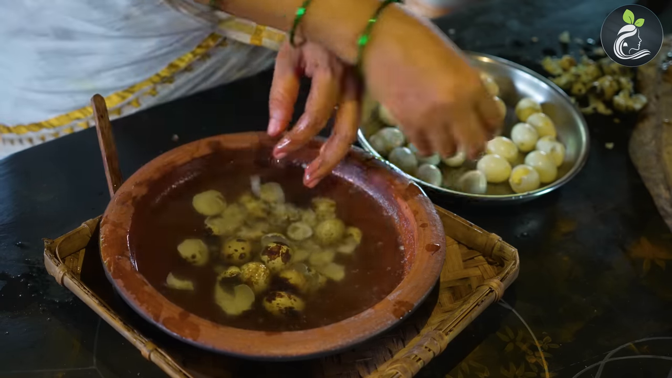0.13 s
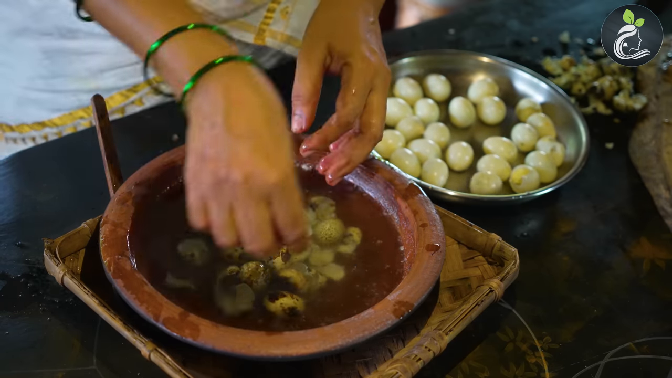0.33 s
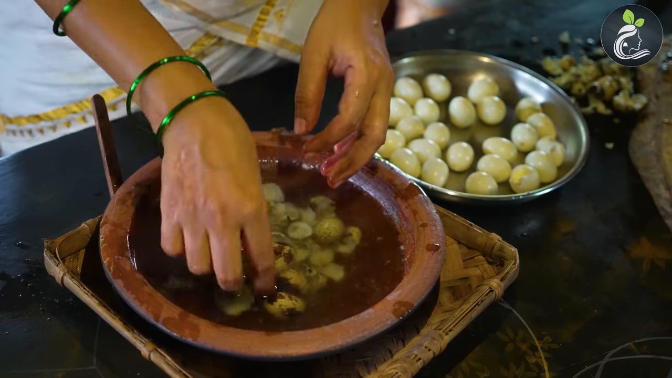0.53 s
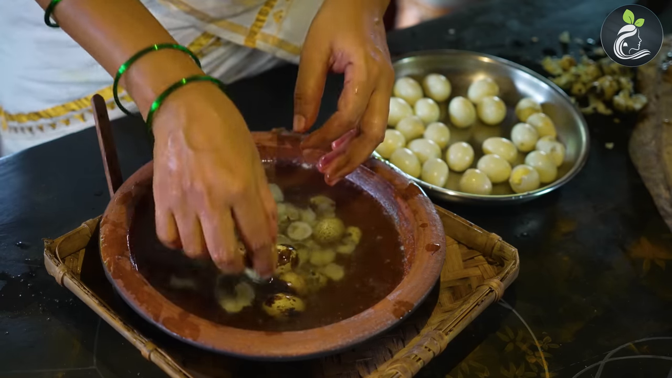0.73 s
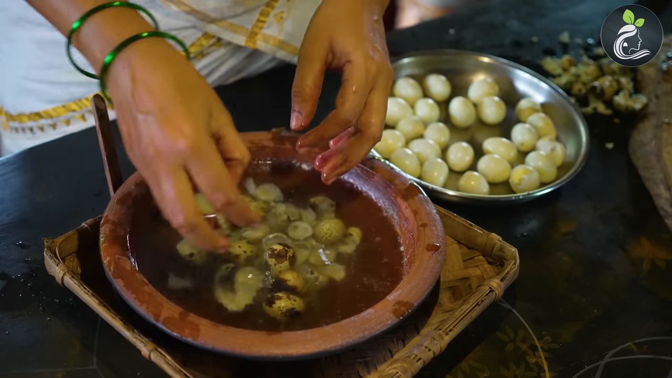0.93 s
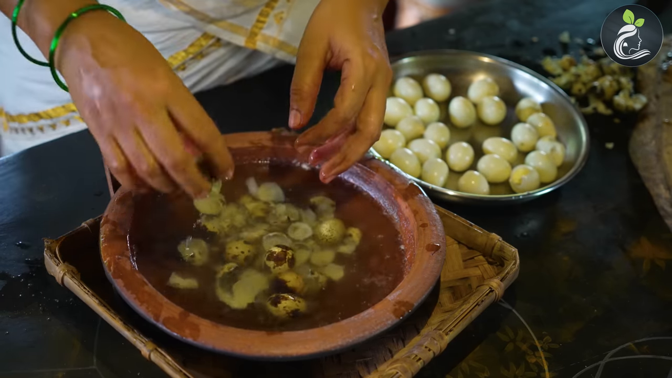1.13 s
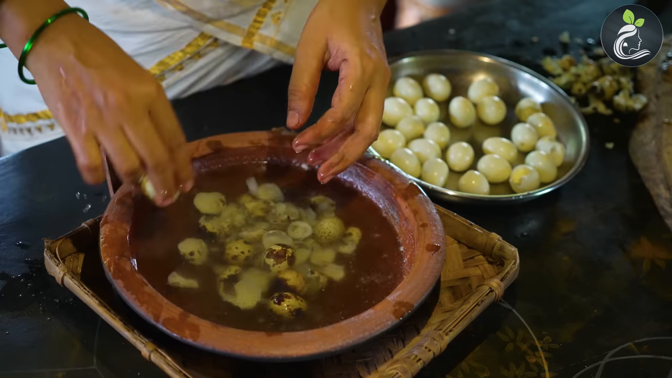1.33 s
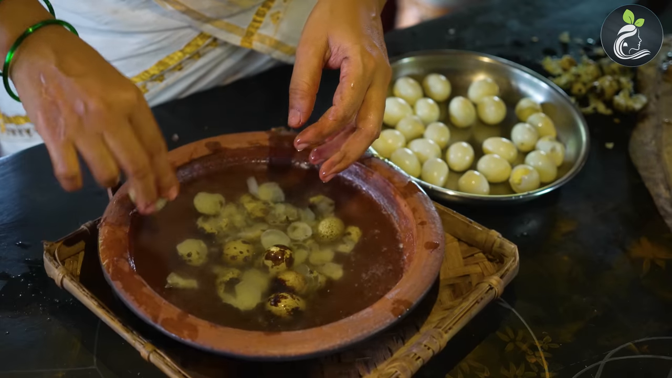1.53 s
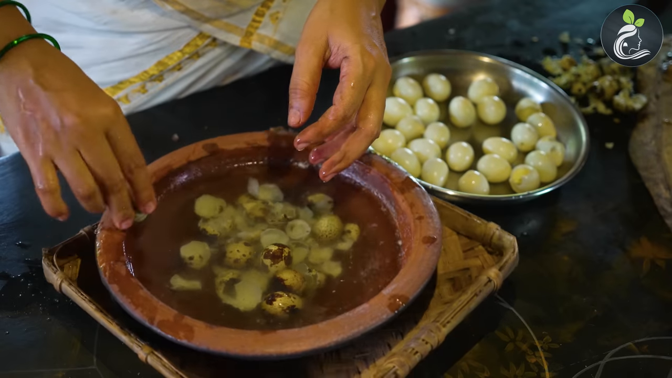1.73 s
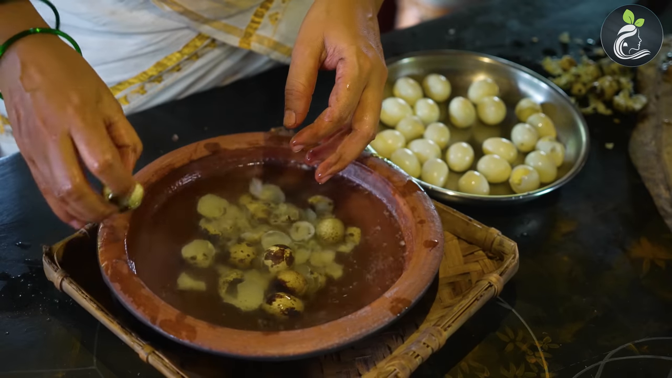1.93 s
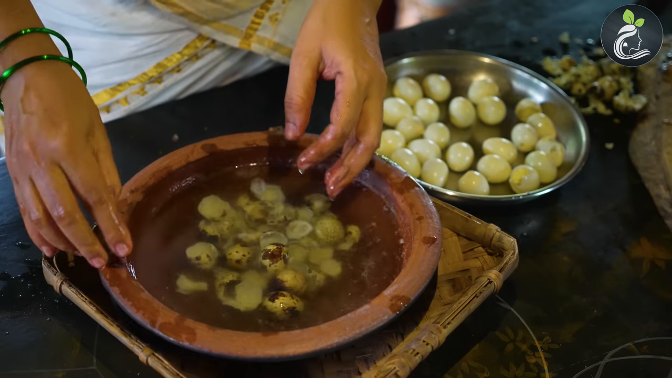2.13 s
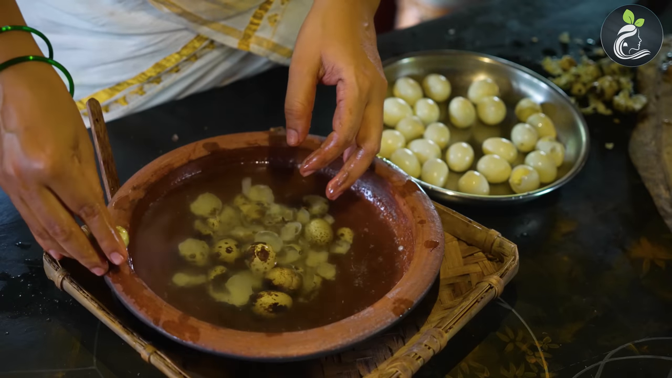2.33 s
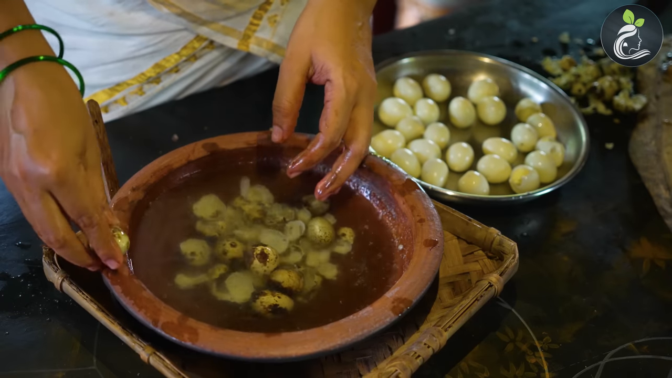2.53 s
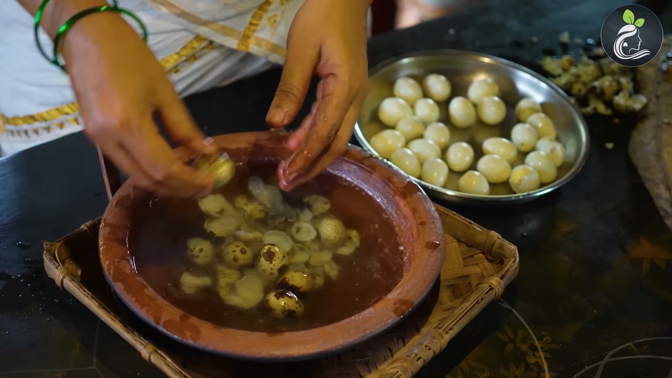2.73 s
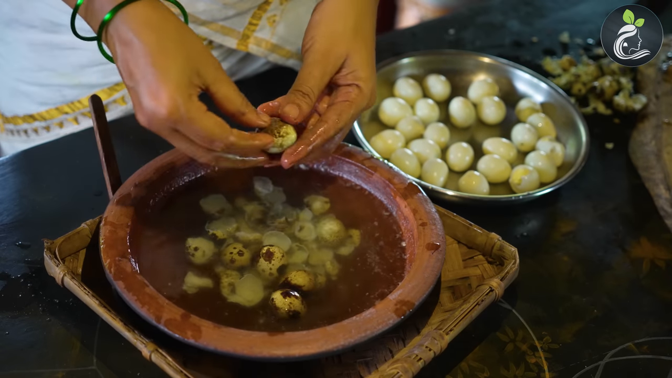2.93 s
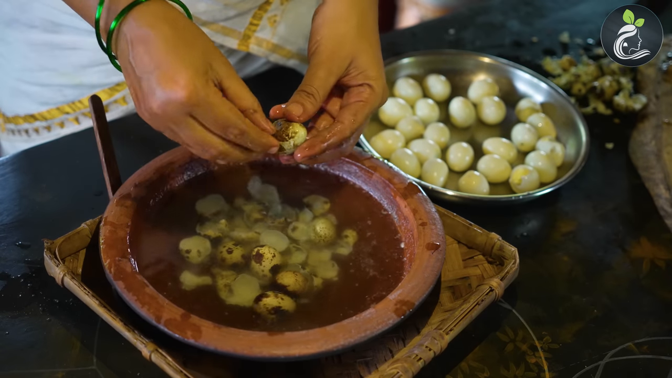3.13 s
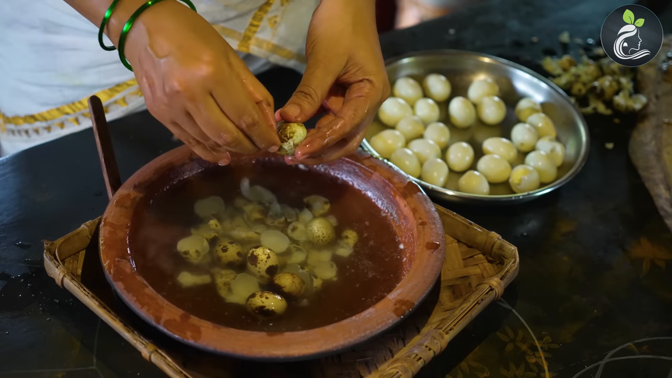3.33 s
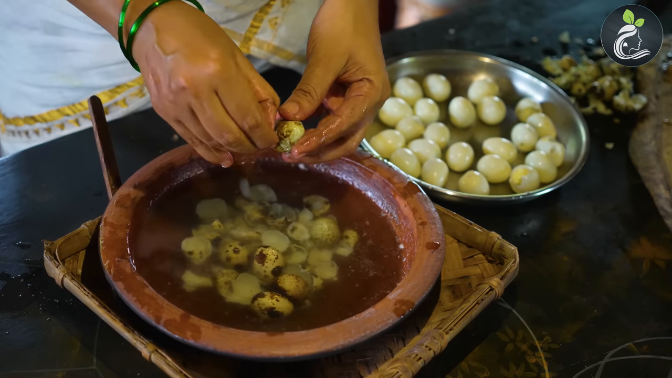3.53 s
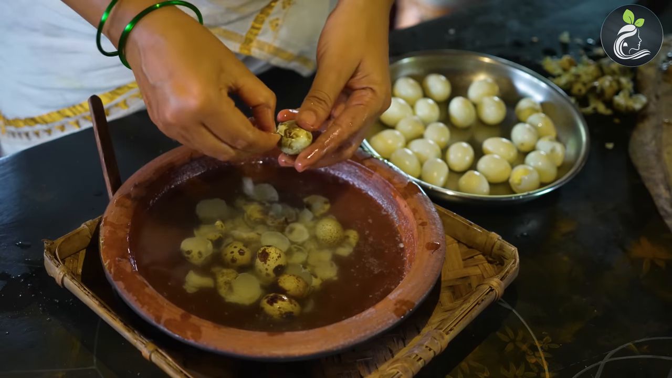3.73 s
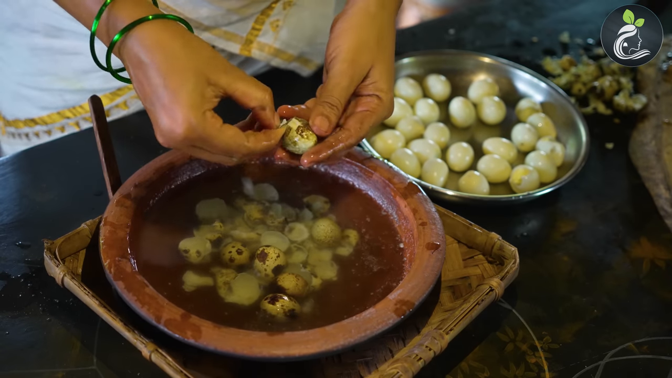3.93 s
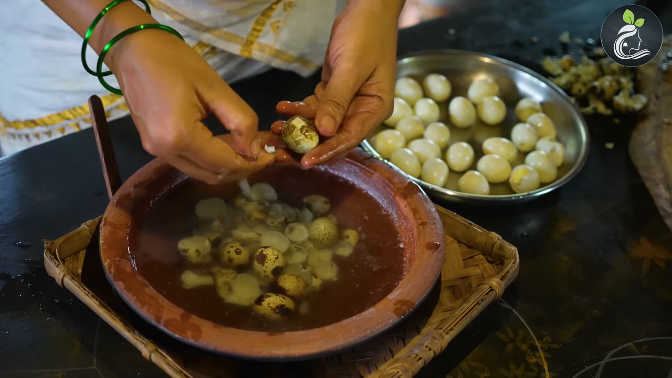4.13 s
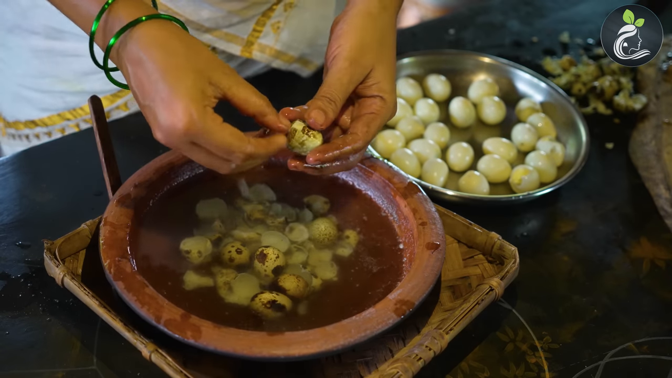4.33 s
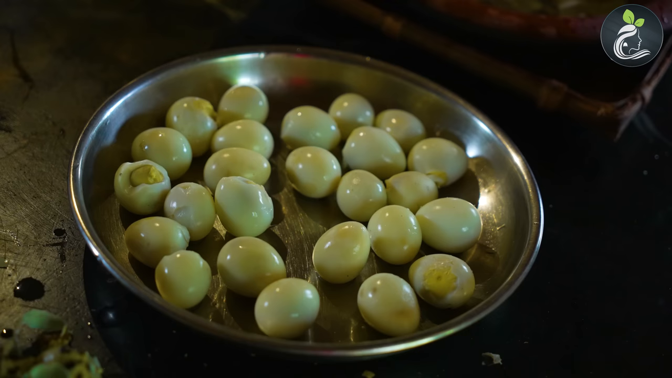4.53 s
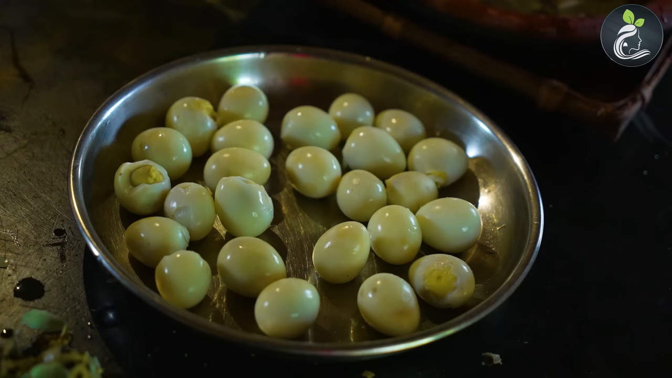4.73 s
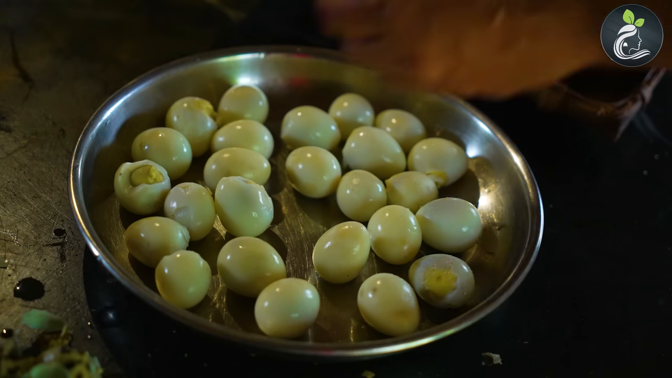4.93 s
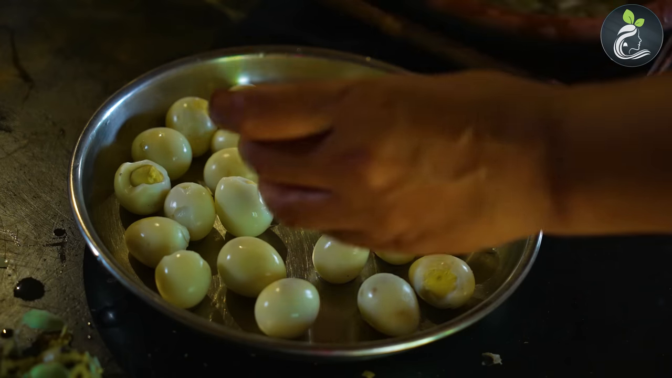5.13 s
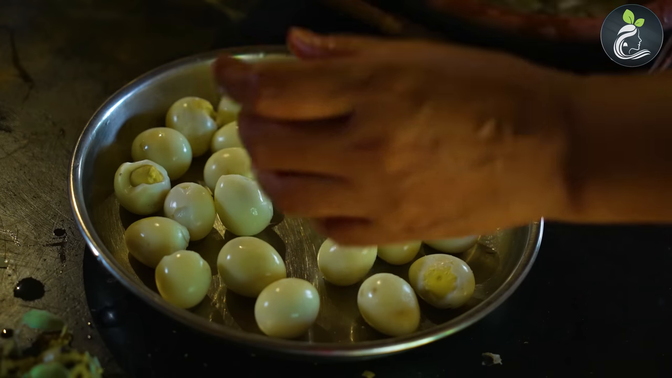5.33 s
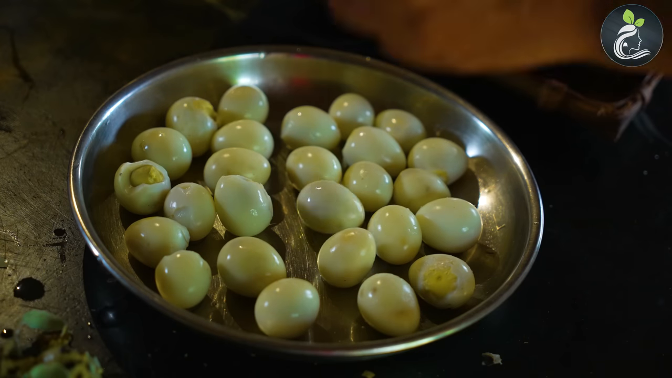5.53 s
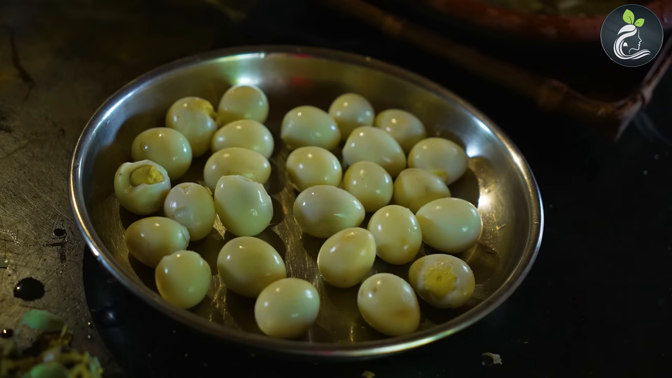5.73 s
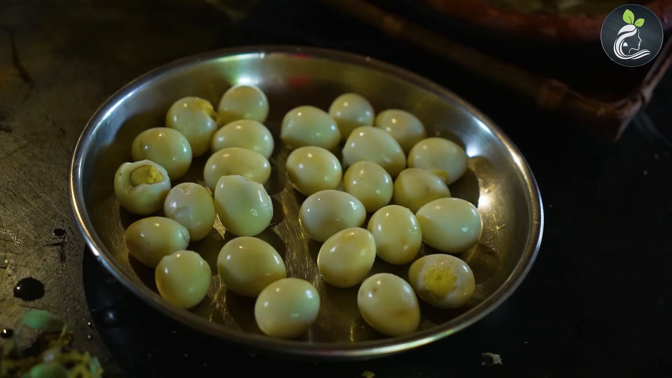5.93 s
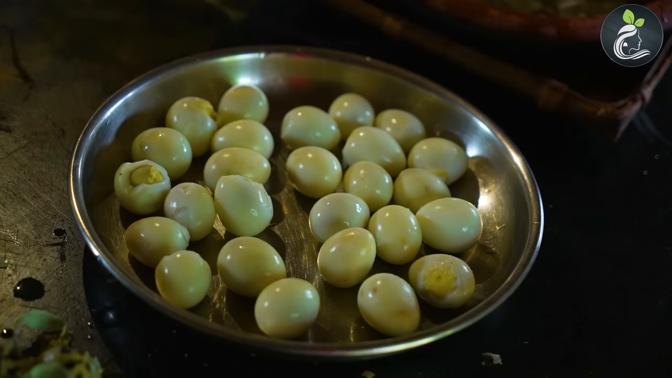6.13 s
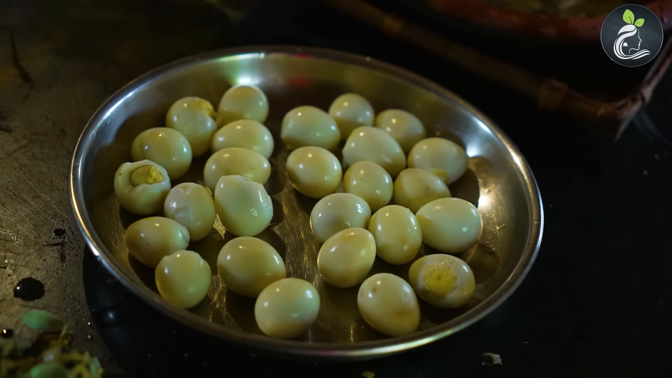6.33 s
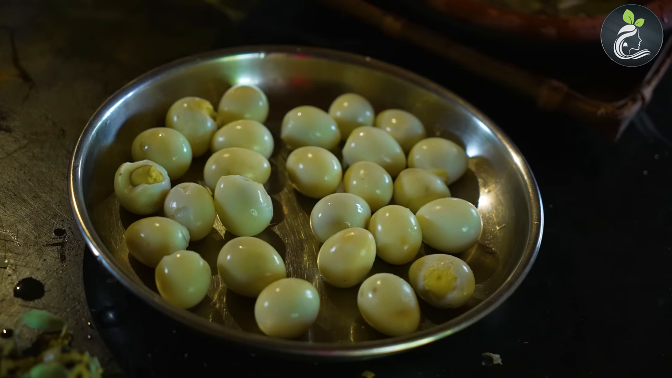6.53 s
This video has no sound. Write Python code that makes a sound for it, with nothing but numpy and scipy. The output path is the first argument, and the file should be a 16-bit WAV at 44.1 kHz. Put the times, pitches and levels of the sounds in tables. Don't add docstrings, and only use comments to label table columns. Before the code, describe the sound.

Small boiled eggs are peeled by hand over a clay bowl of water. Thin bright snaps and a low thud come first, then hard cracking knocks with short hollow clay rings. Insects, soft breeze, a faint engine and small birds stay behind, with distant roosters and a clucking hen. After an abrupt change of ambience, quiet crackles, ticks and a final burst of dry tearing shell, all heard close with slight room echo.

```python
import sys
import numpy as np
from scipy import signal
from scipy.fft import rfft, irfft, next_fast_len
from scipy.io import wavfile
from scipy.ndimage import uniform_filter1d

SR = 44100
rng = np.random.default_rng(int(sys.argv[2]) if len(sys.argv) > 2 else 0)


def decibels_to_gain(level_db):
    exponent = np.asarray(level_db, float) / 20
    return 10 ** exponent


def materialize(psi):
    bounded = np.clip(np.atleast_2d(psi).T, -1, 1)
    quanta = np.round(bounded * 32767).astype(np.int16)
    wavfile.write(sys.argv[1], SR, quanta)


N = 291058
MOVE_S = 4.495


def rms_one(x):
    return x / np.sqrt(np.mean(x ** 2) + 1e-20)


def in_time(rows):
    s, *columns = np.transpose(rows)
    return [np.interp(np.arange(N) / SR, s, c) for c in columns]


def at_hz(points, hz):
    return np.interp(np.log(hz), np.log(np.array(points)[:, 0]), np.array(points)[:, 1])


def drift(rate):
    r = np.exp(-80 * np.pi * rate / SR)
    slow = signal.lfilter([1], [1, -2 * r, r * r], rng.standard_normal(N // 40 + 2002))[2000:]
    return np.interp(np.arange(N) / 40, np.arange(len(slow)), rms_one(slow))


def grains(size, per_s, spread_db):
    sizes = decibels_to_gain(spread_db * np.minimum(rng.exponential(1, size), 4)) * rng.standard_normal(size)
    return rms_one(sizes * (rng.random(size) < per_s / SR))


def band(x, low_hz, high_hz):
    return signal.sosfilt(
        signal.butter(2, [low_hz, min(high_hz, .45 * SR)], "band", fs=SR, output="sos"), x)


def ring(clicks, hz, t60, phase=0):
    r, w = decibels_to_gain(-60 / (t60 * SR)), 2 * np.pi * hz / SR
    return signal.lfilter([np.sin(phase), r * np.sin(w - phase)], [1, -2 * r * np.cos(w), r * r], clicks + 1e-18)


def ports(sound, pan_db):
    return decibels_to_gain(pan_db * np.array([[.5], [-.5]])) * [sound, np.roll(sound, 6)]


def add(out, s, sound):
    at = round(s * SR)
    out[:, at:at + sound.shape[1]] += sound[:, :N - at]


def strike(hits, body, roll_s=0, per_s=0, damping=1):
    out, t = np.zeros((2, N)), np.arange(SR // 4) / SR
    for s, *strength_db in hits:
        giving_way = grains(len(t), max(per_s, 500), spread_db=6.0) * (t < roll_s)
        touch = (t == 0) + giving_way * 0.15
        for group, group_db in zip(body, strength_db):
            for hz, level_db, t60, pan_db, lead in group:
                t60 *= damping
                gain = decibels_to_gain(group_db + level_db + rng.normal(0, 1)) * rng.choice([-1, 1])
                gain /= np.abs(touch @ np.exp(2j * np.pi * hz * t)) + 0.44
                left = decibels_to_gain(pan_db / 2) * ring(touch, hz, t60, lead / 2)
                right = decibels_to_gain(-pan_db / 2) * ring(touch, hz, t60, -lead / 2)
                add(out, s, gain * np.array([left, right]))
    return out


def cracks(events, per_s, snap_db, scatter_db, above=2.22):
    out, t = np.zeros((2, N)), np.arange(SR // 4) / SR
    for s, peak_db, pan_db, t60, crunch_s, hz in events:
        rise = np.minimum(t / (crunch_s / 8 + .0003), 1)
        tail = decibels_to_gain(-60 * np.maximum(t - crunch_s, 0) / t60)
        shape = rise * tail * (1 + decibels_to_gain(snap_db - 60 * t / 0.0086))
        left, right, both = band(shape * grains((3, len(t)), per_s, spread_db=2.5), hz / 3.75, hz * above)
        sound = ports(both, pan_db) + decibels_to_gain(scatter_db) * np.array([left, right])
        add(out, s - .0005, decibels_to_gain(peak_db + 2.05) * sound / np.abs(sound).max())
    return out


def thin_snaps(events, scatter_db):
    return cracks([(*row, .005, .0004, 24000) for row in events], 20000, snap_db=-16, scatter_db=scatter_db)


def call(s, length_s, first_hz, last_hz, db, rise=0.48):
    peak_hz = first_hz + rise * (last_hz - first_hz)
    return [(s, first_hz, db - 5), (s + rise * length_s, peak_hz, db), (s + length_s, last_hz, db - 7)]


def voice(rows, partials, alike, rough, smear=90, clear_s=0.001):
    s, hz, level_db = np.transpose(rows)
    t = np.arange(s[0], s[-1], 1 / SR)
    gate = np.clip(np.minimum(t - s[0], s[-1] - t) / 0.0025, 0, 1)
    rough = rough * np.clip((t - s[0]) / clear_s, .3, 1)
    turns = 2 * np.pi * np.cumsum(np.interp(t, s, hz)) / SR
    shift = np.arccos(np.clip(alike, -1, 1)) / 2 * np.array([[1], [-1]])
    sound = 0
    for k, db in partials:
        noise = rng.standard_normal((2, 2, len(t)))
        smooth = uniform_filter1d(uniform_filter1d(noise, size=smear), size=smear)
        along, across = rough * rms_one(smooth)
        sound = sound + decibels_to_gain(db) * ((1 + along) * np.sin(k * turns + shift) + across * np.cos(k * turns))
    return s[0], decibels_to_gain(np.interp(t, s, level_db) + 4.5) * gate * sound / np.sqrt(1 + rough ** 2)


def yard():
    # [f/Hz, level per Hz/dB]
    bowl_colour = [(21, -42), (35, -9.5), (65, -9.5), (185, -16.5), (325, -11), (410, -11.5), (758, -3),
                   (955, -0.5), (1440, 0), (3910, -6), (6520, -8), (8650, -2.5), (10900, -16.5),
                   (14800, -14.5), (16000, -18)]
    plate_colour = [(21, -40), (35, -10.5), (82, -4.5), (210, -17.5), (351, -19.5), (572, -7), (1060, -4.5),
                    (1810, 1), (2060, -1), (4440, -7.5), (7230, -7), (8650, -2), (10900, -10.5),
                    (14800, -19), (16000, -8.5)]
    # [f/Hz, likeness from -1 to 1]
    likeness = [(60, 1), (150, 1), (380, 0.88), (950, 0.4), (2380, -0.18), (5980, -0.048), (15000, 0.12)]
    # [t/s, level/dB]
    breeze = [(0, -69.5), (.84, -72.5), (1.5, -67.5), (2.83, -72.5), (3.53, -76), (4.15, -79), (4.54, -74),
              (5.13, -70), (5.79, -68), (6.6, -70)]
    breeze_shares = [.98, .1, 0.2, 0.1]
    swell_edges = [270, 1350, 4500]
    out, together, edges = 0, drift(2.5), 30 * 2 ** np.arange(0, 9.4, 1 / 3)
    white, moved = rng.standard_normal((2, 2, N)), np.arange(N) > MOVE_S * SR
    breeze_db, = in_time(breeze)
    breeze_db -= np.where(moved, breeze_db[moved].mean(), breeze_db[~moved].mean())
    for k, (low, high) in enumerate(zip(edges, edges[1:])):
        mid, side = band(white[k % 2], low, high)
        hz = np.sqrt(low * high)
        alike = np.clip(at_hz(likeness, hz), -1, 1)
        colour_db = np.where(moved, at_hz(plate_colour, hz) + .1, at_hz(bowl_colour, hz))
        swell_db = breeze_db * breeze_shares[np.searchsorted(swell_edges, hz)]
        gain = decibels_to_gain(colour_db + swell_db + 0.73 * together + 1.64 * drift(7.0))
        lean_db = np.where(moved, -1.8, .6) * min(hz / 500, 1)
        stereo = np.sqrt(1 + alike) * mid + np.sqrt(1 - alike) * side * [[1], [-1]]
        out = out + gain * decibels_to_gain([lean_db / 2, -lean_db / 2]) * stereo
    return decibels_to_gain(-47.5) * rms_one(out)


def rustle():
    # [t/s, level/dB]
    effort = [(0.0, -60.5), (0.66, -73), (1.14, -61), (1.47, -63), (1.9, -59.5), (2.89, -71), (3.38, -70),
              (3.58, -63), (4.41, -72), (4.52, -56), (4.67, -63), (4.78, -54.5), (5.18, -65), (5.53, -55.5),
              (5.84, -49.5), (6.45, -70)]
    fine = grains((2, N), 7500, spread_db=1.0) + 0.47 * grains(N, 6900, spread_db=-2.0)
    bright, dark = rms_one(band(fine, 12300, 14000)), rms_one(band(fine, 2000, 8000))
    return decibels_to_gain(in_time(effort)[0] - 1.0 + 2.0 * drift(26)) * (bright + decibels_to_gain(-1.0) * dark)


def drone():
    # [f/Hz, t60/s, level/dB]
    engine = [(436, 0.096, -70), (577, 0.025, -64), (945, 0.18, -68), (1441, 0.14, -64)]
    plate_hum = [(1860, 0.013, -64.5), (82.2, 0.38, -75.5)]
    own, shared, t = rng.standard_normal((2, N)), rng.standard_normal(N), np.arange(N) / SR

    def hum(bands):
        return sum(decibels_to_gain(db) * rms_one(ring(shared + own * hz / 1500, hz, t60)) for hz, t60, db in bands)

    swell_db = np.clip(-6.5 + 5 * (t - 2.56), -6.5, 0)
    return np.where(t < MOVE_S, decibels_to_gain(swell_db) * hum(engine), decibels_to_gain(4.2 * drift(8.3)) * hum(plate_hum))


def small_birds():
    # [t/s, length/s, first f/Hz, last f/Hz, peak/dB]
    whistles = [(.654, .048, 2880, 2370, -50), (0.15, 0.077, 3300, 3100, -61),
                (.725, 0.0185, 1880, 1960, -54), (0.68, 0.03, 2600, 2400, -53),
                (0.77, 0.0165, 2550, 2400, -58), (1.935, 0.03, 2850, 2680, -50.5),
                (1.895, 0.031, 3700, 3400, -54), (5.2, .065, 4040, 4060, -57), (5.3, 0.07, 4250, 4200, -60),
                (6.2, .035, 2850, 2700, -61), (5.575, 0.04, 3300, 3100, -54), (5.835, .04, 3500, 3350, -55),
                (4.5, .03, 3480, 3480, -61), (2.3, 0.083, 2300, 1700, -56), (3, 0.15, 2300, 1420, -65)]
    rasps = [(1.05, 0.26, 1800, 1700, -58.5), (1.935, .04, 1830, 1860, -53), (2.855, .05, 1816, 1820, -55),
             (4.49, 0.12, 6160, 6800, -56.5), (6.52, .08, 1800, 1900, -61), (6.36, .03, 1450, 1600, -55),
             (4.56, .05, 1900, 1900, -63), (4.85, .22, 1830, 1780, -59),]
    rising_rasp = (1.12, 0.11, 2800, 3020, -55)
    # [f/Hz, likeness from -1 to 1]
    bird_likeness = [(2000, 0.97), (2750, 0.49), (2950, -0.18)]
    # [t/s, f/Hz, level/dB, length/s]
    peeps = [
        (3.755, 4160, -60, 0.017),
        (3.784, 4200, -58, 0.031),
        (4.015, 4260, -60, .03),
        (4.28, 4120, -65, 0.049),
    ]
    out = np.zeros((2, N))
    for rows, rough in ((whistles, 0.51), ([rising_rasp] + rasps, 0.87)):
        for row in rows:
            add(out, *voice(call(*row), [(0.99, .1)], at_hz(bird_likeness, row[3]), rough))
    for s, hz, db, length_s in peeps:
        add(out, *voice([(s, hz, db), (s + length_s, hz, db)], [(0.97, .1)], alike=0.27, rough=0.62))
    return out


def snaps():
    # [t/s, peak/dB, left-right/dB]
    snap_events = [(0.191, -30, 10), (1.7379, -38, 4), (1.9669, -37, -7), (1.9802, -26, -4),
                   (2.08, -28, 30), (2.7482, -30, 5), (2.866, -25.5, 11), (3.188, -25.5, 4),
                   (3.432, -31, -25), (3.602, -23, 1.0), (3.8094, -39, 3), (3.932, -32, 5),
                   (3.9743, -21.5, 12), (4.6504, -41, 1.0), (5.67, -27.5, -2)]
    return thin_snaps(snap_events, scatter_db=-1.5)


def crunches():
    # [t/s, peak/dB, left-right/dB, crunch length/s]
    crushed = [(0.3854, -27, -8, 0.016), (0.5294, -32.5, 2, 0.02), (1.8467, -39, -6, 0.015),
               (2.2578, -29.5, 5, 0.025), (2.2822, -21.5, -1, 0.026), (2.3224, -24, 0, 0.015),
               (3.5514, -25.5, -13, 0.03), (4.5294, -36, -3, 0.02), (4.6254, -36.5, -2, 0.016),
               (4.6848, -29, -2.0, 0.012), (4.7855, -37, -3, 0.014), (4.8294, -30, -10, 0.005),
               (4.8883, -27, -9, 0.0065), (5.3083, -32.5, 6, 0.011), (6.0626, -31, -3, 0.014)]
    flakes = [
        (6.2188, -22, -9, 0.015),
        (6.2540, -20.5, -11, 0.015),
        (6.3238, -21.5, -7, 0.012),
    ]
    grinds = [
        (2.282, -31, 7, 0.0096),
        (2.324, -33.5, 9, 0.014),
        (6.219, -33, -11, .006),
        (6.254, -38, -5, .006),
    ]
    events = []
    for rows, hz in ((crushed, 14300), (flakes, 22000), (grinds, 2480)):
        events += [(s, db, pan, 0.16, length_s, hz) for s, db, pan, length_s in rows]
    return cracks(events, 17000, snap_db=-3, scatter_db=8.0)


def thuds():
    # [t/s, peak/dB, centre f/Hz, t60/s]
    basket = [(0.535, -48, 363, 0.34), (.934, -33, 483, 0.17), (.944, -42.5, 238, .12),
              (.94, -42.5, 58, 0.33), (1.845, -45, 94, 0.17), (1.9, -55, 56.4, 0.59),
              (2.14, -56.5, 111.4, .3), (2.589, -37, 470, 0.2), (2.63, -59, 124, 0.22),
              (2.747, -44.5, 340, 0.25), (3.231, -55, 100, 0.27)]
    events = [(s, db, 0, t60, 1.3 / hz, hz) for s, db, hz, t60 in basket]
    return cracks(events, 4000, snap_db=7, scatter_db=-50, above=1.76)


def plops():
    # [t/s, strength/dB]
    dips = [
        (.561, -28),
        (.5705, -36),
    ]
    # [f/Hz, level/dB, t60/s, left-right/dB, left lead/rad]
    pool = [
        [(1230, -0.5, 0.086, -1.3, .2), (1337, 4.5, 0.075, -1, .3), (1580, -4, 0.054, 0, 0),
         (1680, -3.5, 0.075, 1, -0.14), (2308, -8, 0.14, 0, -.8)],
    ]
    return decibels_to_gain(-2.0) * strike(dips, pool)


def ticks():
    # [t/s, peak/dB, f/Hz, left-right/dB]
    bits = [(0.935, -41, 720, -3), (1.502, -40, 1500, 2.0), (1.673, -32, 2750, 6),
            (1.982, -36.5, 2200, 4.5), (3.382, -44, 1460, 7), (3.786, -43, 950, 9), (4.651, -41, 2780, -14),
            (4.827, -42, 1960, -10), (4.887, -42, 1830, -8), (4.984, -42, 1700, -3.0),
            (5.146, -43, 1900, 0), (5.985, -31, 2300, -16), (6.062, -38, 2500, 1.0), (.677, -42, 3000, 0),
            (5.02, -37, 2600, 0), (6.218, -46, 1830, -2), (6.254, -41, 1480, -8), (6.323, -42, 3610, -2.0),
            (6.43, -38, 3940, -14)]
    out, t = np.zeros((2, N)), np.arange(SR // 8) / SR
    for s, peak_db, hz, pan_db in bits:
        touch = rng.standard_normal(len(t)) * decibels_to_gain(-60 * t / 0.004)
        sound = band(band(ring(touch, hz, 0.0076), hz / 1.27, hz * 4.8), hz / 2.7, hz * 2.9)
        add(out, s - .001, ports(decibels_to_gain(peak_db + 2.0) * sound / np.abs(sound).max(), pan_db))
    return out


def splits():
    # [t/s, peak/dB, f/Hz, left-right/dB]
    steps = [(1.3461, -13, 6500, 0), (1.3488, -18.5, 4000, 3), (1.4062, -36, 14000, 0),
             (1.549, -32, 8000, 0), (1.5517, -15, 8000, 0), (1.5553, -18, 4500, 2), (1.7506, -24, 7000, -8),
             (2.1265, -21.5, 7000, 0), (2.284, -31, 5500, 0), (2.2905, -27, 5500, -2),
             (2.2945, -32.5, 1500, 7), (2.2976, -42, 1500, 3), (2.3065, -24, 5500, 0),
             (2.3268, -29, 5500, -2), (2.3335, -34, 5200, 0), (2.3375, -24.5, 5500, 0),
             (3.5965, -30, 15000, 2), (0.9345, -35, 3000, 0), (0.9452, -44, 2800, 0),
             (0.9504, -43, 700, -2), (4.8345, -32, 7000, -10), (4.8880, -32, 5000, -8),
             (4.8958, -33, 8000, -8)]
    events = [(s, db, pan, 0.0054, .0004, hz) for s, db, hz, pan in steps]
    return cracks(events, 30000, snap_db=-16, scatter_db=3.0, above=1.47)


def knock_cracks():
    # [t/s, peak/dB, left-right/dB]
    breaks = [
        (1.3458, -13.5, -0.5),
        (1.5515, -13, -3),
        (1.7504, -20.5, -1),
        (2.126, -18.5, 3),
    ]
    return cracks([(*row, 0.16, 0.0019, 5000) for row in breaks], 14000, snap_db=1.0, scatter_db=5.0)


def egg_shell():
    # [t/s, strength/dB]
    shell_hits = [
        (1.3458, -18),
        (1.5518, -18),
        (1.751, -33),
        (2.127, -26),
    ]
    # [f/Hz, level/dB, t60/s, left-right/dB, left lead/rad]
    shell = [
        [(1700, -0.5, 0.03, -3, 0), (1413, -8, 0.035, 1, 0), (1248, -9.5, 0.045, 2, 0),
         (2150, -12, 0.024, 0, 0), (4750, -7, 0.032, -3, 0), (5200, -1, 0.026, -5, 0)],
    ]
    return band(strike(shell_hits, shell), 1070, 9000)


def bowl():
    # [t/s, strength/dB, third, fourth and fifth group against it/dB, set by the place struck]
    rim_knocks = [
        (1.346, -28, 8.5, 2, 2),
        (1.552, -26.5, -7, 9, 5.5),
        (1.750, -34, 1.5, 2, -2),
        (2.127, -21.5, -6, -0.5, -12),
        (2.387, -58, -2.5, 16, 5),
    ]
    # [t/s, upper second group/dB, fourth group/dB, third group/dB]
    rolls = [
        (2.2828, -40, -29, -46),
        (2.292, -38, -31, -48),
        (2.2975, -42, -30, -50),
        (2.3075, -44, -36, -50),
        (2.3245, -42, -32, -50),
        (2.3365, -30, -41, -50),
    ]
    # [t/s, low group/dB, high group/dB]
    after_rings = [
        (1.347, -39, -44),
        (1.553, -43, -40),
        (1.751, -43, -56),
        (2.128, -35.5, -50),
    ]
    # [f/Hz, level/dB, t60/s, left-right/dB, left lead/rad]
    clay = [
        [(1007, -8, .12, 1, .5), (1330, -12, .06, -1, .1), (1672, 0, .08, 0, -.3)],
        [(1857, 0, .11, -5, -.7), (2345, -7, .08, -5, -.4), (2890, -7, .1, -2, .4)],
        [(2665, -10, .09, -3, .9), (2780, 0, .085, 0, 1.2), (3005, -6, .1, 6, 2.2), (3320, -10, .07, 0, .8)],
        [(4034, 0, .095, -5, -.5), (4720, -11, .07, -2, .2)],
        [(5231, 0, .1, -8, .4), (5515, -9, .1, -2, 1.5)],
    ]
    wall = [
        [(1010, -5, 0.19, 1, .5), (1850, 0.5, 0.21, -7, -0.81), (2800, 5.5, 0.16, -2, .4),
         (2860, 5, .13, 3, 1.2)],
        [(4040, 0, .16, -5, -.5), (5300, -7, .17, -8, .4)],
    ]
    rim = [clay[1][2:], clay[3], clay[2]]
    hits = [(s, db + 0.4 * upper_db[2], db, *(db + np.array(upper_db))) for s, db, *upper_db in rim_knocks]
    return strike(hits, clay, 0.0027, 2100, damping=0.73) + strike(rolls, rim) + strike(after_rings, wall)


def fowl():
    # [t/s, length/s, first f/Hz, last f/Hz, peak/dB]
    knock_tail = [
        (2.15, 0.12, 2780, 2480, -45.5),
        (2.15, 0.08, 3300, 3300, -47.5),
        (2.15, 0.093, 2000, 2250, -50),
    ]
    # [t/s, f/Hz, level/dB]
    crows = [
        [(2.506, 2170, -63), (2.535, 2420, -47.5), (2.56, 2560, -57), (2.575, 2430, -59), (2.7, 2460, -59.5)],
        [(2.545, 2000, -60), (2.56, 1850, -57), (2.6, 1840, -63), (2.7, 1960, -63)],
        [(3.028, 1680, -63), (3.05, 1890, -54), (3.075, 2070, -62), (3.12, 2150, -66)],
        [(3.125, 2296, -62), (3.146, 2306, -57), (3.19, 2196, -62), (3.27, 2260, -59), (3.305, 2220, -60),
         (3.34, 1960, -59)],
        [(3.08, 1600, -63), (3.11, 1660, -61), (3.138, 1770, -59), (3.17, 1710, -60), (3.21, 1700, -63)],
        [(5.44, 1790, -69), (5.526, 1772, -56), (5.6, 1795, -58), (5.69, 1817, -57), (5.72, 1650, -54),
         (5.74, 1540, -63)],
    ]
    crow_rough = [.9, 1.4, .3, .6, .7, .7]
    # [t/s, f/Hz, level/dB]
    cluck = [
        (2.818, 2217, -54),
        (2.832, 2170, -47),
        (2.86, 2128, -48),
        (2.89, 2100, -53),
        (2.96, 2076, -63),
    ]
    # [multiple of f, level/dB]
    cluck_partials = [(2 / 3, -5.5), (1, 0), (4 / 3, -8), (5 / 3, -7.5)]
    out = np.zeros((2, N))
    for row in knock_tail:
        add(out, *voice(call(*row, rise=0.23), [(0.98, .1)], smear=60, alike=.5, rough=1.8))
    for rows, rough in zip(crows, crow_rough):
        add(out, *voice(rows, [(1, 0.9)], alike=1.0, rough=rough, smear=150, clear_s=.05))
    add(out, *voice(cluck, cluck_partials, smear=55, alike=.2, rough=2.2, clear_s=.08))
    return out


def squeaks():
    # [t/s, length/s, first f/Hz, last f/Hz, peak/dB]
    rubs = [
        (3.553, .04, 12500, 11600, -48),
        (6.51, .09, 2650, 2800, -55),
        (5.77, .09, 990, 990, -57.5),
    ]
    out = np.zeros((2, N))
    for row in rubs:
        add(out, *voice(call(*row), [(1, .1)], smear=round(150000 / row[2]), alike=.3, rough=4))
    return out


def bangle():
    # [t/s, strength/dB]
    clinks = [
        (3.602, -30.5),
        (3.614, -36),
    ]
    # [f/Hz, level/dB, t60/s, left-right/dB, left lead/rad]
    glass = [
        [(7660, -2, .06, 0, 1.3), (8600, -12, .15, -4, 4.5), (10100, -3.5, .07, 5, .9),
         (12720, -3, 0.09, 0, 1.5), (13900, -2, .11, 8, -2.5)],
    ]
    twins = [
        [(13810, -4, .12, 6, -2.0), (12650, -7, .1, 0, 1.5), (8650, -12, .13, -4, 4.0), (5534, -20, .08, 0, 0)],
    ]
    return strike(clinks, glass), strike(clinks[:1], twins)


def crackles():
    # [t/s, peak/dB, left-right/dB]
    sharp = [
        (6.2285, -27, -5),
        (6.2345, -29, -5),
        (6.2605, -22, -7),
        (6.2627, -25, -7),
        (6.2702, -35, -7),
        (6.332, -28, -7),
    ]
    return thin_snaps(sharp, scatter_db=1.0)


def kitchen(x):
    size = next_fast_len(N + SR)
    w = 2 * np.pi * np.arange(size // 2 + 1) / size
    dull = 1 / (1 + 1j * w * SR / (2 * np.pi * 18000))
    out = np.zeros((2, len(w)), complex)
    for k, lag in enumerate(rng.uniform(.003, .017, 16) * SR):
        loop = decibels_to_gain(-60 * lag / SR / 0.15) * dull * np.exp(-1j * w * round(lag))
        out[k % 2] += loop / (1 - loop) * (-1) ** (k // 2)
    return irfft(out * rfft(x, size), size)[:, :N]


def scene():
    outside = yard() + drone() + small_birds() + fowl()
    glass, glass_twins = bangle()
    near = band(plops() + bowl() + glass, 810, 10600)
    near += crunches() + ticks() + splits() + knock_cracks()
    close = snaps() + thuds() + rustle() + egg_shell() + squeaks() + glass_twins + crackles()
    return outside + near + close + decibels_to_gain(-16.5) * kitchen(near.mean(axis=0))


def low_pass(x):
    return signal.sosfilt(signal.butter(12, 16960, fs=SR, output="sos"), x)


def record(dry):
    top_hz, edge_hz = 15780, 16950
    size = next_fast_len(N)
    hz, spectrum = np.arange(size // 2 + 1) * SR / size, rfft(dry, size)
    body = irfft(spectrum * (hz < top_hz) / np.sqrt(1 + (39 / (hz + 1)) ** 8), size)[:, :N]
    strip = irfft(spectrum * (hz >= top_hz) * (hz < edge_hz), size)[:, :N]
    power = uniform_filter1d(strip ** 2, size=128)
    burst = power > 16 * uniform_filter1d(power, size=4096)
    sudden = uniform_filter1d(1. * burst, size=256)
    return low_pass(body + decibels_to_gain(-3) * sudden * strip)


dry = scene()
out = record(dry)
materialize(out)
```